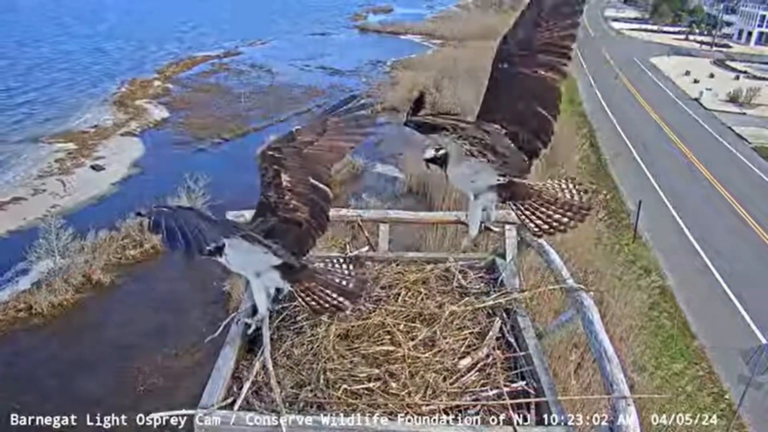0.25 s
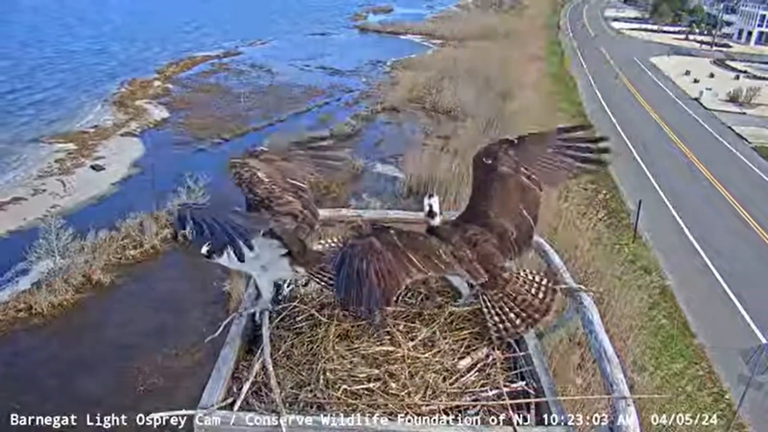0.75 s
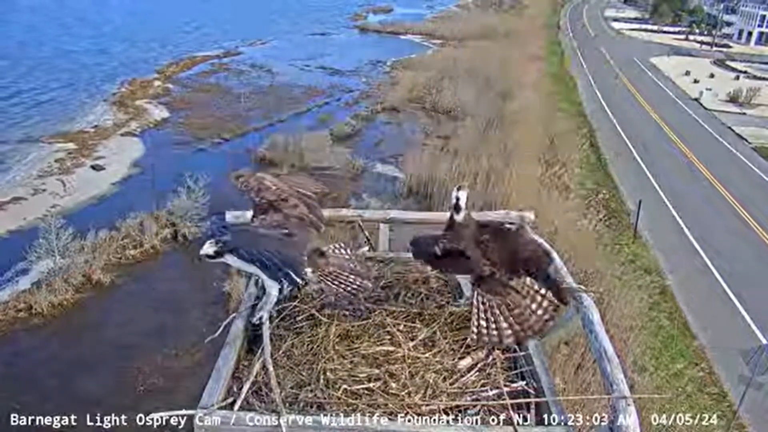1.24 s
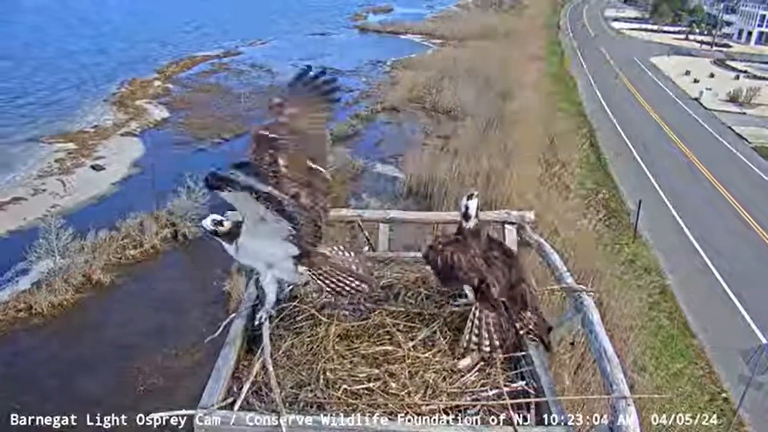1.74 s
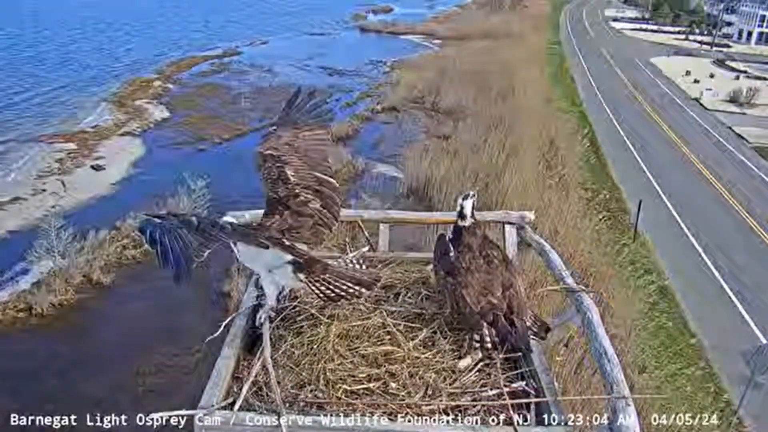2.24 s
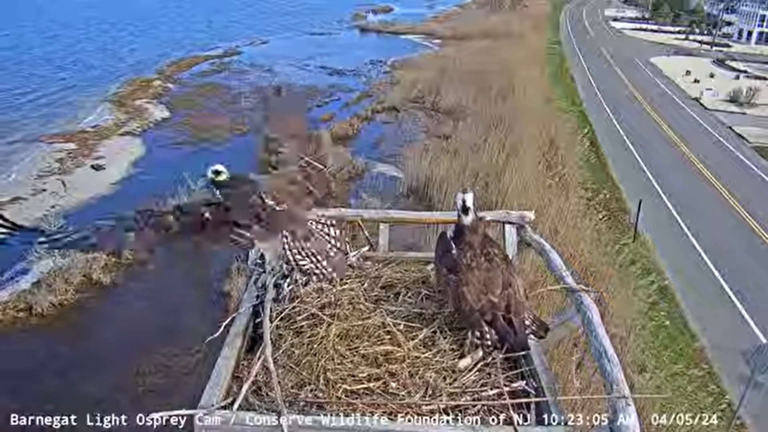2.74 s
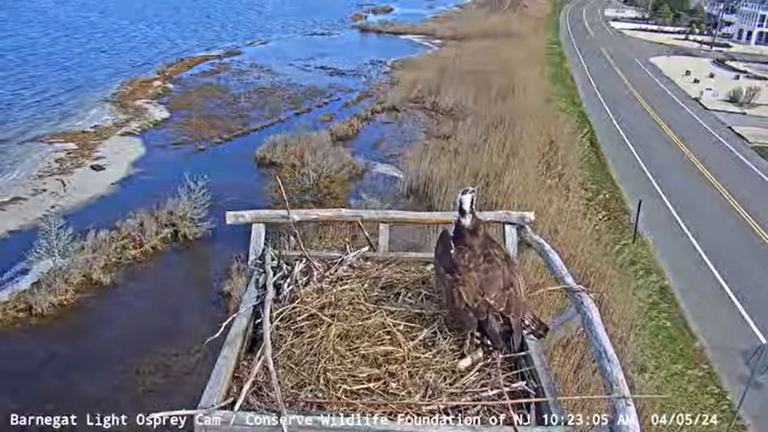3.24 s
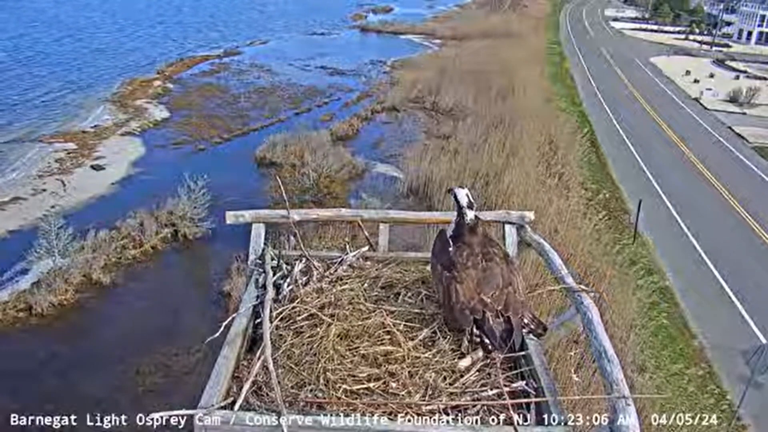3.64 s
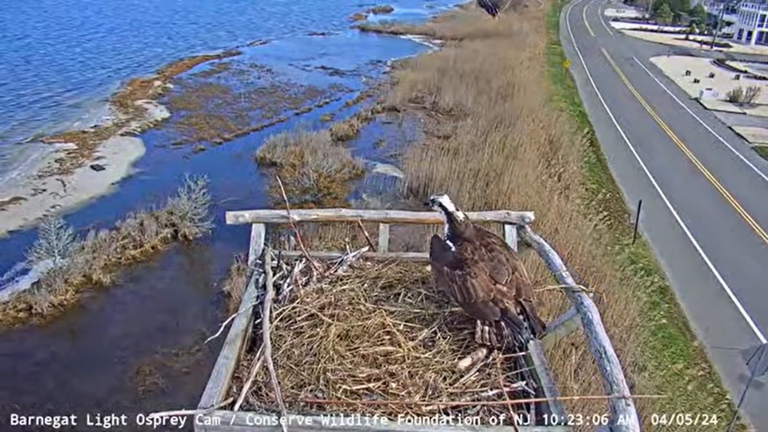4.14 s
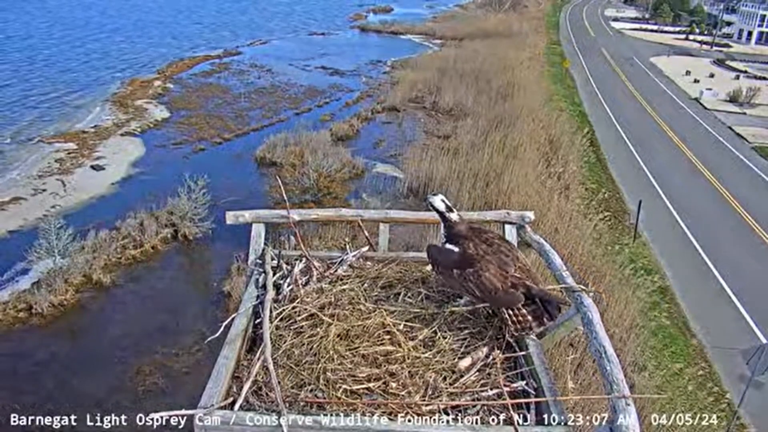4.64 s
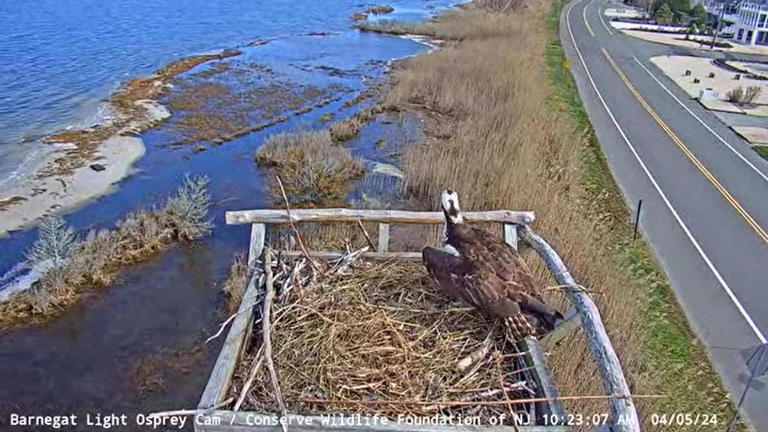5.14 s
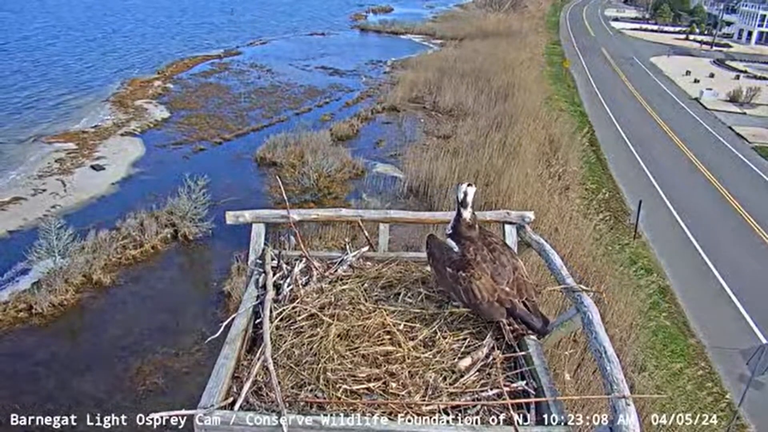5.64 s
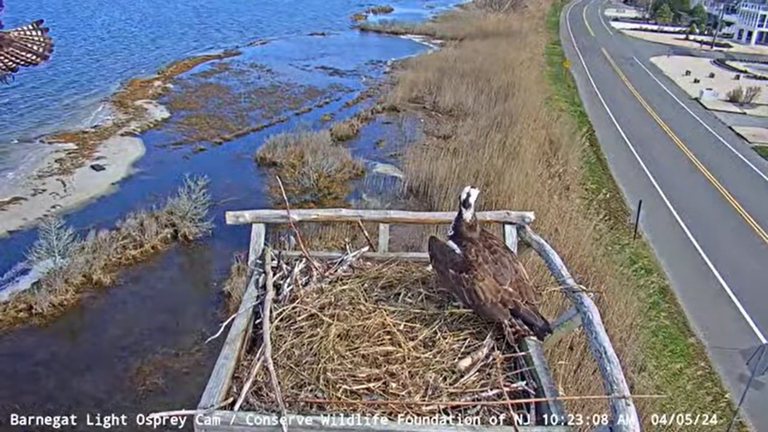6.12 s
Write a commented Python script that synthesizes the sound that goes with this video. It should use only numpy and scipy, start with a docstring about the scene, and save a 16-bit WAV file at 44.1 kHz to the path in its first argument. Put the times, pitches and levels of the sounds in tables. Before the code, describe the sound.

Two large birds of prey at a windy nest: a rush of wings, quick high chirps, falling whistles, then a screech breaking into hoarse clicks.

```python
"""Two ospreys on an open nest platform: a first whistle, then one lands with a rush of wing air over the microphone.
Chirps with opening pips and thin squeaks follow, then falling whistles among rumbling gusts, while the whole sound
briefly dips in level. Near the end a long two-voiced screech turns hoarse and breaks into clicks; one short whistle
closes the scene. Voices are pairs of sine oscillators with overtones and mixing tones; a wall some ten metres off
echoes them. Throughout, shaped noise gives wind and distant surf, with puffs of rustling and faint steady tones."""
import sys
import numpy as np
from scipy import signal
from scipy.fft import rfft, irfft
from scipy.io import wavfile
from scipy.ndimage import uniform_filter1d

SR = 44100
rng = np.random.default_rng(int(sys.argv[2]) if len(sys.argv) > 2 else 0)


def unload_audio(sound):
    """Save the sound as a 16-bit wav file, at the path given as the first command line argument."""
    columns = np.transpose(np.atleast_2d(sound))
    # keep every value between -1 and 1, then stretch to whole-number steps
    steps = np.round(np.clip(columns, -1, 1) * 32767)
    wavfile.write(sys.argv[1], SR, steps.astype(np.int16))


N = 281295

# Short chirps of the stronger voice. Each row: start in seconds, length in seconds, pitch in Hz,
# peak level in dB, overtone lift in dB.
CHIRPS = [(0.41, 0.015, 2628, -36, -7), (0.446, 0.027, 2640, -33.5, 1), (0.661, 0.036, 2747, -25, -3),
          (0.88, 0.035, 2752, -27, 0.5), (1.115, 0.037, 2744, -26, 2.5), (1.325, 0.036, 2680, -26, 3.5),
          (1.536, .038, 2681, -25.5, 2)]
# Falling whistles of the stronger voice. Each row: start in seconds, length in seconds, swoop in Hz (positive
# from above), swoop time constant in seconds, pitch in Hz, hold in seconds, sag in Hz per second, lowest pitch
# in Hz, swell in dB, peak level in dB, time of the peak after the start in seconds, overtone lift in dB.
WHISTLES = [(.099, 0.044, 799.5, .008, 2470, 0.0021, 2200, 2200, 17, -31.5, .027, -12),
            (2.34, 0.052, 121.5, .006, 2560, 0.0025, 4800, 2200, 5.5, -26.5, 0.028, -8.5),
            (3.547, 0.044, 499.5, .006, 2432, .002, 3600, 2200, 15, -28, .022, -12),
            (3.915, 0.097, 1900, .007, 3296, 0.0021, 10480, 2440, 17, -22, 0.053, -4),
            (4.509, 0.12, 1859.5, .0057, 3722, 0.0018, 9800, 2650, 9, -17.5, .08, -4),
            (5.032, 0.1, 2706, .0058, 3458, 0.051, 13000, 2820, 12.5, -17.5, .078, -9),
            (5.138, 0.016, 21.5, .003, 2930, .006, 20140, 2500, 7, -25, .005, -6),
            (5.203, .036, -40.5, .003, 2934, 0.017, 7500, 2600, 9, -27.5, .007, -4),
            (6.291, 0.025, 40.5, .003, 2790, .006, 22000, 2200, 17, -26, 0.016, -7)]
# The long screech, stronger voice, in two parts. Each row: time in seconds, pitch in Hz, level in dB.
SCREECH = [
    [(5.634, 2810, -38), (5.643, 2920, -21.5), (5.66, 2990, -20), (5.676, 2980, -20), (5.695, 2910, -25),
     (5.715, 2820, -28), (5.735, 2790, -47), (5.748, 2740, -49), (5.76, 2813, -30.5), (5.78, 2807, -28.5),
     (5.805, 2700, -41)],
    [(5.829, 2760, -40), (5.838, 2950, -37), (5.842, 3000, -44), (5.845, 3640, -29.5), (5.85, 3710, -24.5),
     (5.868, 3620, -21.5), (5.879, 3556, -29), (5.884, 3280, -38), (5.889, 2770, -30), (5.898, 2740, -29.5)],
]
# Overtone lift of each part of the screech, in dB.
SCREECH_LIFT_DB = [-4.5, 0]
# The hoarse stretch of the screech: from in seconds, to in seconds, spread of the level throb in dB.
HOARSE_STRETCH = (5.879, 5.9, 2.1)
# The second voice under the screech, in two parts. Each row: time in seconds, pitch in Hz, level in dB.
UNDERTONE = [
    [(5.697, 2390, -46), (5.706, 2250, -39.5), (5.75, 2174, -38.5), (5.773, 2220, -39), (5.79, 2200, -59),
     (5.815, 2030, -45), (5.83, 2084, -41.5), (5.843, 2390, -43)],
    [(5.849, 2790, -33), (5.858, 3020, -36), (5.87, 2940, -35.5), (5.882, 2880, -32)],
]
# Thin gliding squeaks of the second voice. Each row: start in seconds, length in seconds, first pitch in Hz,
# last pitch in Hz, peak level in dB.
SQUEAKS = [(0.689, 0.022, 1610, 1480, -41), (1.095, .016, 6000, 4000, -35.5),
           (1.25, 0.0082, 2370, 2450, -44.5), (1.263, 0.012, 3130, 5210, -34),
           (1.3, .03, 6760, 3540, -33.5), (5.189, 0.012, 5270, 4236, -38), (5.225, .027, 2390, 2013, -42.5),
           (6.282, .007, 5450, 4680, -43.5), (6.292, 0.0045, 3720, 3400, -39)]
# Throat resonance acting on the second harmonic. Each row: frequency in Hz, gain in dB before the overtone lift.
THROAT = [(4400, -13.5), (4900, -7.5), (5400, -6), (6000, 0.5), (6700, -4), (7200, -15.5), (8000, -27)]
# Clicks into which the screech breaks. Each row: time in seconds, level at the onset in dB, ring in Hz.
RATTLE = [(5.8993, -26, 2700), (5.9015, -22, 3000), (5.9046, -20, 3920), (5.909, -25.5, 2162),
          (5.9139, -26, 4200), (5.9195, -26.5, 3660)]
# Dry ticks in the nest. Each row: time in seconds, level at the onset in dB, ring in Hz.
TICKS = [(1.032, -41, 1800), (1.242, -35.5, 1600), (3.296, -33.5, 2600)]
# Pips as the throat opens on a note. Each row: time of the crest in seconds, peak level in dB, pitch in Hz.
PIPS = [(0.659, -34.5, 3750), (0.878, -34.5, 3680), (1.114, -29.5, 3660), (1.328, -30, 3540),
        (1.534, -31, 3720), (6.289, -26, 3690)]
# Two faces of the wall. Each row: delay in seconds, reflection level in dB before wavering and dulling.
WALL = [(.059, -20), (.066, -26)]
# Steady air over the microphone. Each row: time in seconds, rumble level in dB.
BREEZE = [(0, -49.5), (.9, -49), (2.4, -48), (3.5, -47), (4.9, -43), (6.38, -44.5)]
# Wing rush: start in seconds, then the lengths of its swell, beating and dying away in seconds.
WING_RUSH = (.12, .035, .38, .05)
# Rumble level of the beating wings: at first in dB, at last in dB.
WING_RUSH_DB = (-20, -27.5)
# Gusts. Each row: crest in seconds, rumble level in dB, time to fall 10 dB on either side in seconds.
GUSTS = [(1.89, -43.5, 0.03), (2.073, -31, 0.05), (2.85, -39.5, 0.22), (3.0, -39, 0.23),
         (3.401, -40.5, 0.14), (3.944, -28.5, 0.01), (4.049, -32, 0.0549), (4.2, -36, 0.05),
         (4.542, -30, 0.09), (5.101, -39, 0.25)]
# Spectral shape of eddies on the microphone. Each row: frequency in Hz, relative density in dB.
BUFFET = [(25, -16), (60, -6), (180, 2), (400, -3.5), (800, -10), (1400, -22.5), (3000, -41.5),
          (7000, -61.5)]
# Spectral shape of steady wind and distant surf. Each row: frequency in Hz, relative density in dB.
AMBIENCE = [(20, -5), (45, -1.5), (110, -1), (250, -12), (600, -19), (1500, -26), (3200, -35), (5000, -43),
            (7700, -51.5)]
# Puffs of rustling feathers and twigs. Each row: middle in seconds, level in dB, length in seconds.
RUSTLE = [(0.414, -52, 0.028), (0.502, -70, 0.025), (0.58, -56.5, 0.13), (2.754, -54, 0.052),
          (2.973, -55.5, 0.11), (3.168, -60, 0.17), (6.155, -52, 0.018)]
# Faint steady tones. Each row: from in seconds, to in seconds, frequency in Hz, middle level in dB.
WHINES = [(0, 6.4, 1630, -64.5), (5.58, 6.1, 1228, -55)]
# Brief dips in the level of the whole sound. Each row: middle in seconds, length in seconds, depth in dB.
DIPS = [(.186, .003, 20), (.415, .002, 20), (.454, .002, 20), (.477, .003, 20), (.498, .003, 15),
        (3.966, .008, 11), (4.544, .002, 6), (4.556, .0025, 15), (4.572, .0025, 15), (4.593, .004, 10),
        (4.609, .0035, 8)]

CHIRP_SCOOP_HZ, CHIRP_SCOOP_S = -60, 0.0028   # each chirp starts below its pitch
CHIRP_HOLD, CHIRP_PEAK = .45, .22   # as shares of the length
CHIRP_SAG_HZ_PER_S, CHIRP_LOWEST_HZ, CHIRP_SWELL_DB = 15000, 2220, 9
CHIRP_FADE_DB, WHISTLE_FADE_DB = 18, 13   # loss from the peak to the end of a note
CHIRP_FADE_POWER, WHISTLE_FADE_POWER = 2.8, 2.36   # higher powers hold the level longer before it falls
KNEE_S, LEVEL_OUT_HZ = 0.0028, 59.9   # how softly a sag begins and levels out
PRESS_FOLLOWS = 0.22   # dB of overtone for each dB of voice
SQUEAK_BEND, SQUEAK_EDGE_DB = .75, 11.5   # under 1 the glide is fastest at first; loss at both ends
AMBIENCE_DB = -40


def from_db(db):
    """Amplitude ratio: 20 dB make a factor of ten."""
    return 10 ** (np.asarray(db) / 20)


def rms_one(x):
    """Normalisation to unit mean power."""
    return x / np.sqrt(np.mean(x ** 2) + 1e-20)


def in_time(s, values, **outside):
    """Linear interpolation between points, one value a sample."""
    return np.interp(np.arange(N) / SR, s, values, **outside)


def at_hz(points, hz):
    """Linear interpolation of a spectrum in dB on a logarithmic frequency axis."""
    points_hz, points_db = np.array(points).T
    return np.interp(np.log(hz), np.log(points_hz), points_db)


def drift(corner_hz):
    """Random modulation: white noise through two equal real poles, at unit power."""
    r = np.exp(-2 * np.pi * corner_hz / SR)
    settling = SR   # samples dropped while the filter settles
    noise = rng.standard_normal(N + settling)
    return rms_one(signal.lfilter([1], [1, -2 * r, r * r], noise)[settling:])


def coloured(x, spectrum):
    """Spectral shaping in the frequency domain, at unit power."""
    hz = np.maximum(np.fft.rfftfreq(N, 1 / SR), 1)
    return rms_one(irfft(rfft(x) * from_db(at_hz(spectrum, hz)), N))


def voices(sum_db, difference_db, second_overtone_db, third_db, clash_db, breath_db):
    """Nonlinear coupling: two near-sine membranes with overtones mix into sum and difference tones."""
    notes, lifts_db = main_notes()
    hz, height = played(notes, fade_s=.0018)
    second_notes = sorted([squeak(*row) for row in SQUEAKS] + UNDERTONE)
    hz2, height2 = played(second_notes, fade_s=.0025)

    # overtones grow as a note nears its peak
    starts = [note[0][0] - .004 for note in notes]
    which = np.maximum(np.searchsorted(starts, np.arange(N) / SR) - 1, 0)
    peaks_db = np.array([max(db for _, _, db in note) for note in notes])
    below_peak_db = 20 * np.log10(height) - peaks_db[which]
    lift_db = np.array(lifts_db)[which] + PRESS_FOLLOWS * below_peak_db

    # the second voice unsettles the first, and itself flutters in level
    clash = np.clip(height2 / height, 0, 1)
    height = height * from_db(clash_db * clash * drift(220))
    height2 = height2 * from_db(clash_db * drift(200))

    # hoarseness: random throb and pitch jitter
    hoarse_from, hoarse_to, throb_db = HOARSE_STRETCH
    hoarse = in_time([hoarse_from, hoarse_to], [1, 1], left=0, right=0)
    height = height * from_db(hoarse * throb_db * drift(250))
    hz = hz * (1 + .06 * hoarse * drift(500))

    phase = 2 * np.pi * np.cumsum(hz) / SR
    phase2 = 2 * np.pi * np.cumsum(hz2) / SR
    main = np.sin(phase) + from_db(lift_db + at_hz(THROAT, 2 * hz)) * np.cos(2 * phase)
    third_fade = np.clip((9000 - 3 * hz) / 500, 0, 1)   # third harmonic vanishes from 8500 to 9000 Hz
    main += from_db(third_db + lift_db) * third_fade * np.sin(3 * phase)
    # air noise skirts each line
    main += from_db(breath_db) * drift(720) * (np.sin(phase) + np.cos(2 * phase))
    second = np.sin(phase2) + from_db(second_overtone_db) * (hz2 < 3100) * np.cos(2 * phase2)
    mixed = from_db(sum_db) * np.cos(phase + phase2)
    mixed += from_db(difference_db) * (np.cos(2 * phase - phase2) + np.cos(phase + 2 * phase2))
    return height * main + height2 * second + np.minimum(height, height2) * mixed


def main_notes():
    """Succession in time: all notes of the stronger voice, and the overtone lift of each."""
    notes = []
    for s, length, hz, db, lift_db in CHIRPS:
        chirp = whistle(s, length, CHIRP_SCOOP_HZ, CHIRP_SCOOP_S, hz, CHIRP_HOLD * length,
                        CHIRP_SAG_HZ_PER_S, CHIRP_LOWEST_HZ, CHIRP_SWELL_DB, db, CHIRP_PEAK * length,
                        CHIRP_FADE_DB, CHIRP_FADE_POWER)
        notes.append((chirp, lift_db))
    for *shape, lift_db in WHISTLES:
        notes.append((whistle(*shape, WHISTLE_FADE_DB, WHISTLE_FADE_POWER), lift_db))
    notes += list(zip(SCREECH, SCREECH_LIFT_DB))
    return zip(*sorted(notes))


def whistle(s, length, swoop_hz, settle, hz, hold, sag, lowest_hz, swell_db, peak_db, peak_s, fade_db, power):
    """Frequency modulation: pitch relaxes exponentially, holds, sags and levels out as level swells and fades."""
    t = np.linspace(0, length, num=40)
    fall_hz = sag * KNEE_S * np.logaddexp(0, (t - hold) / KNEE_S)
    pitch = hz + swoop_hz * np.exp(-t / settle) - fall_hz
    pitch = lowest_hz + LEVEL_OUT_HZ * np.logaddexp(0, (pitch - lowest_hz) / LEVEL_OUT_HZ)
    swell_loss = swell_db * (1 - t / peak_s) ** 2
    fade_loss = fade_db * np.abs((t - peak_s) / (length - peak_s)) ** power
    loss_db = np.where(t < peak_s, swell_loss, fade_loss)
    return list(zip(s + t, pitch, peak_db - loss_db))


def squeak(s, length, from_hz, to_hz, peak_db):
    """Glide by frequency ratio, loudest in the middle."""
    u = np.linspace(0, 1, num=20)
    pitch = from_hz * (to_hz / from_hz) ** (u ** SQUEAK_BEND)
    level_db = peak_db - SQUEAK_EDGE_DB * (2 * u - 1) ** 2
    return list(zip(s + length * u, pitch, level_db))


def played(notes, fade_s):
    """Continuous pitch and amplitude contours, each note fading in and out quickly."""
    rows = []
    for note in notes:
        first_s, first_hz, _ = note[0]
        last_s, last_hz, _ = note[-1]
        rows += [(first_s - fade_s, first_hz, -90)] + list(note) + [(last_s + fade_s, last_hz, -90)]
    s, hz, db = np.transpose(rows)
    pitch = uniform_filter1d(in_time(s, hz), size=131)
    height = uniform_filter1d(in_time(s, from_db(db)), size=65)
    return pitch, height


def clicks(rows, t60, crack_db):
    """Damped resonance: each click rings and decays exponentially, with a crack of white noise."""
    out = np.zeros(N)
    t = np.arange(SR // 50) / SR
    for s, db, hz in rows:
        ring = np.sin(2 * np.pi * hz * t) + from_db(crack_db) * rng.standard_normal(len(t))
        out[round(s * SR):][:len(t)] += from_db(db - 60 * t / t60) * ring
    return out


def pips(length_s, puff_db):
    """Gaussian tone bursts with a puff of air, which is noise rising with frequency."""
    t = np.arange(N) / SR
    puff = from_db(puff_db) * np.diff(rng.standard_normal(N + 1))
    out = np.zeros(N)
    for s, db, hz in PIPS:
        burst = np.exp(-((t - s) / length_s) ** 2)
        out += from_db(db) * burst * (np.sin(2 * np.pi * hz * t) + puff)
    return out


def echoed(x, dull_hz, waver_db, tail_db, tail_t60, haze_db):
    """Reflection: a dull, wavering double echo, a scattered tail behind it and a weak haze before it."""
    t = np.arange(SR // 3) / SR - WALL[0][0]   # zero at the first echo
    scatter_db = np.where(t > 0, tail_db - 60 * t / tail_t60, haze_db)
    response = from_db(scatter_db) * rng.standard_normal(len(t))
    back = signal.fftconvolve(x, response)[:N]
    for delay_s, db in WALL:
        delayed = np.interp(np.arange(N) - delay_s * SR, np.arange(N), x, left=0)
        back += from_db(db + waver_db * drift(60)) * delayed
    return x + signal.lfilter(*signal.butter(1, dull_hz, fs=SR), back)


def wind_level():
    """Addition of incoherent powers: breeze, wing rush and gusts as one level in dB over time."""
    t = np.arange(N) / SR
    breeze_db = in_time(*np.transpose(BREEZE))
    rush_db = in_time(np.cumsum(WING_RUSH), [-46, *WING_RUSH_DB, -44], left=-99, right=-99)
    gusts_db = [db - 10 * np.abs(t - crest) / fall for crest, db, fall in GUSTS]
    return 10 * np.log10(sum(from_db(2 * db) for db in [breeze_db, rush_db, *gusts_db]))


def buffeting(level_db, lumps_db, peaky, dull_hz):
    """Turbulent pressure of eddies on the microphone: lumpy, with pointed crests, brighter when strong."""
    eddies = coloured(rng.standard_normal(N), BUFFET) * from_db(lumps_db * drift(35))
    eddies = eddies + peaky * eddies ** 2   # the square sharpens one side of the wave
    eddies = rms_one(signal.lfilter(*signal.butter(1, 30, "high", fs=SR), eddies))
    dull = rms_one(signal.lfilter(*signal.butter(1, dull_hz, fs=SR), eddies))
    strong = np.clip((level_db + 42.5) / 15, 0, 1)
    return from_db(level_db) * (strong * eddies + (1 - strong) * dull)


def rustle(lumps_db):
    """Friction noise of feathers and twigs: high-passed noise in uneven Gaussian puffs."""
    t = np.arange(N) / SR
    high = signal.butter(2, 2500, "high", fs=SR, output="sos")
    noise = signal.sosfilt(high, rng.standard_normal(N))
    level = sum(from_db(db) * np.exp(-(2 * (t - s) / length) ** 2) for s, db, length in RUSTLE)
    return level * rms_one(noise * from_db(lumps_db * drift(40)))


def whines():
    """Pure tones with random amplitude and phase modulation."""
    t = np.arange(N) / SR
    out = np.zeros(N)
    for start, end, hz, db in WHINES:
        fade = in_time([start, start + .1, end - .1, end], [0, 1, 1, 0])
        level = from_db(db + 1.8 * drift(23))
        out += level * fade * np.sin(2 * np.pi * hz * t + 0.46 * drift(4.7))
    return out


def ambience():
    """Stationary noise of steady wind and distant surf, slowly wavering in level."""
    return from_db(AMBIENCE_DB + 1.1 * drift(2.4)) * coloured(rng.standard_normal(N), AMBIENCE)


def brief_dips(level_db, per_s, depth_db, length):
    """Gain modulation by brief drops: listed ones, and chance ones more frequent when the wind is strong."""
    t = np.arange(N) / SR
    loss_db = sum(db * np.exp(-(2 * (t - s) / width) ** 4) for s, width, db in DIPS)
    rate = per_s * from_db(2 * (level_db + 27))   # dips a second; per_s holds at -27 dB of wind
    chance = rng.random(N) < rate / SR
    dip = depth_db * np.hanning(round(length * SR))
    loss_db += np.convolve(chance * rng.random(N), dip, "same")
    return from_db(-loss_db)


def scene():
    """Superposition: birds with their echoes over wind, the whole briefly dipping in level."""
    birds = voices(sum_db=-9.5, difference_db=-20, second_overtone_db=-17.5, third_db=-29.5,
                   clash_db=3.5, breath_db=-29.5)
    birds += clicks(RATTLE, t60=0.0071, crack_db=-7)
    birds += clicks(TICKS, t60=.012, crack_db=-14)
    birds += pips(length_s=0.0014, puff_db=-13)
    birds = echoed(birds, dull_hz=3540, waver_db=2.0, tail_db=-51.0, tail_t60=0.2, haze_db=-59.0)
    wind_db = wind_level()
    air = buffeting(wind_db, lumps_db=2.5, peaky=.12, dull_hz=458)
    air += ambience() + rustle(lumps_db=-3.5) + whines()
    gain = brief_dips(wind_db, per_s=36, depth_db=34.5, length=0.0026)
    return ((birds + air) * gain)[None]


def record(dry):
    """Saturation rounds the crests; a steep low-pass cuts the top, and a faint electronic hiss is added."""
    rounded = .6 * np.tanh(dry / .6)
    stop_edge_hz = 8028.85   # 70 dB down from here up
    low_pass = signal.cheby2(18, 70, stop_edge_hz, fs=SR, output="sos")
    cut = signal.sosfilt(low_pass, rounded)
    return cut + from_db(-95) * rng.standard_normal(dry.shape)


dry = scene()
out = record(dry)
unload_audio(out)
```